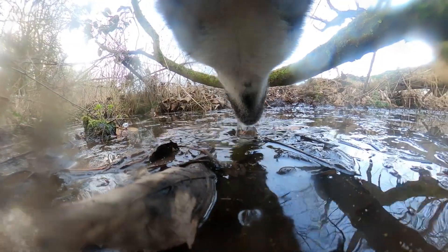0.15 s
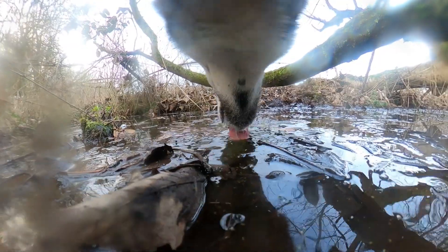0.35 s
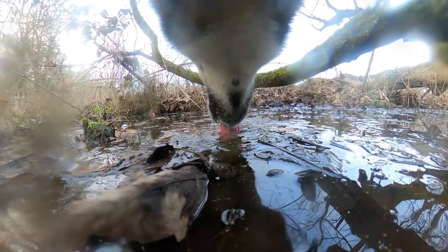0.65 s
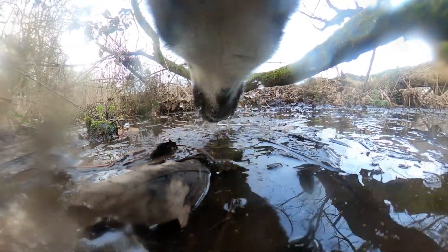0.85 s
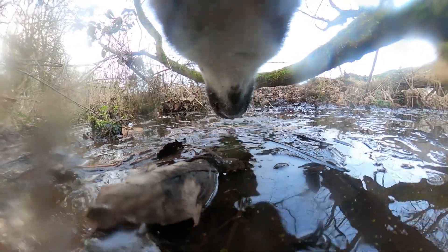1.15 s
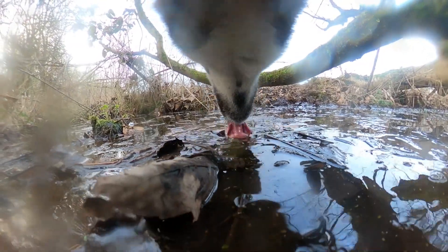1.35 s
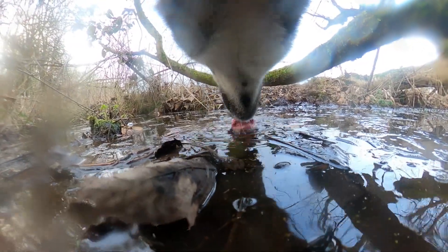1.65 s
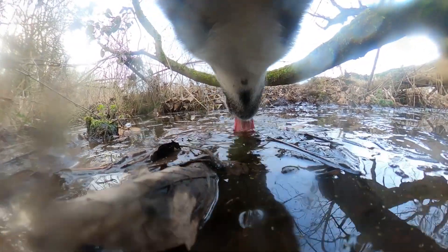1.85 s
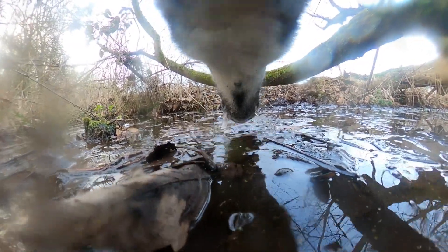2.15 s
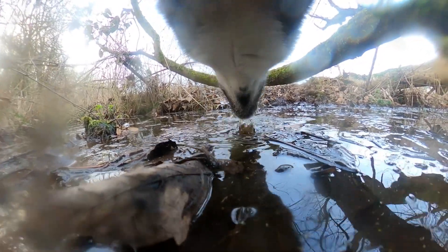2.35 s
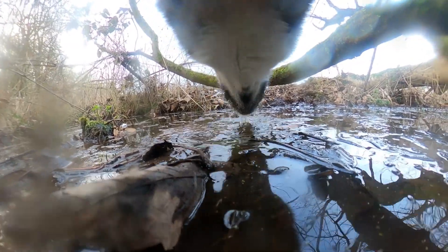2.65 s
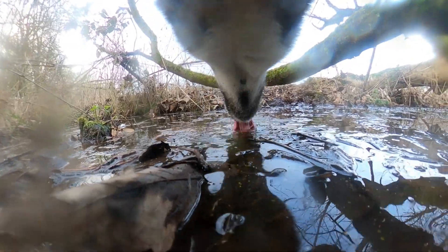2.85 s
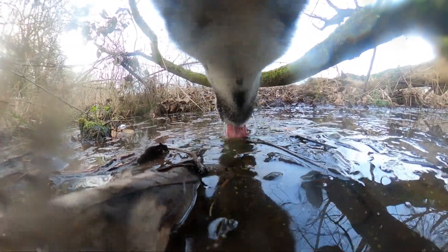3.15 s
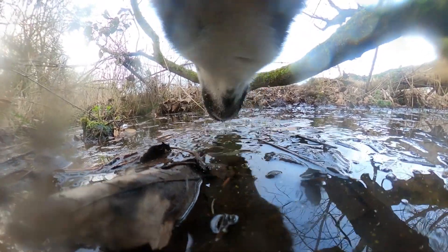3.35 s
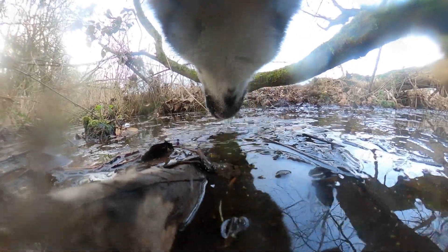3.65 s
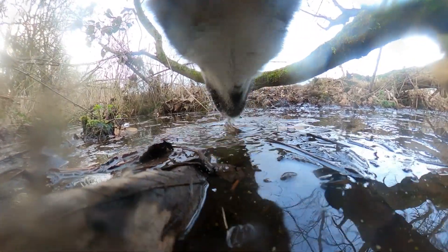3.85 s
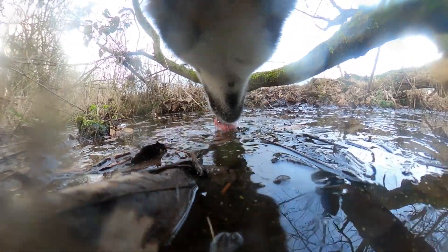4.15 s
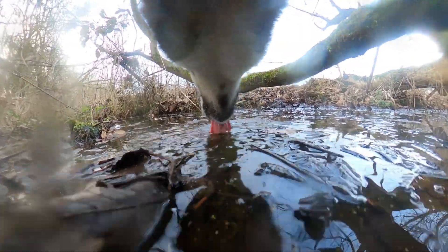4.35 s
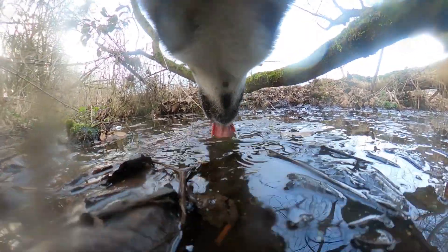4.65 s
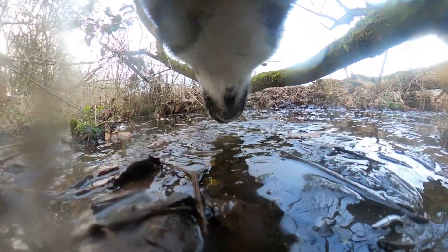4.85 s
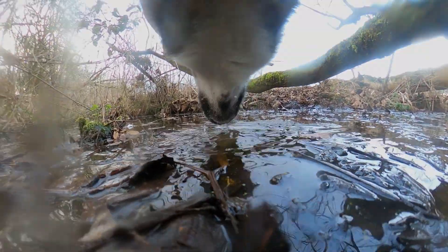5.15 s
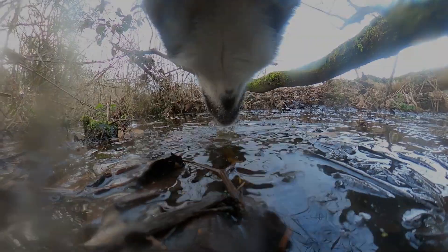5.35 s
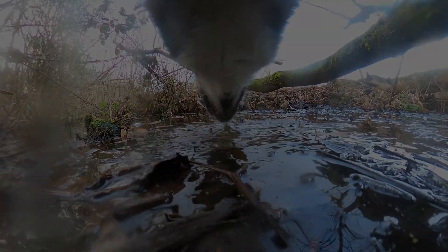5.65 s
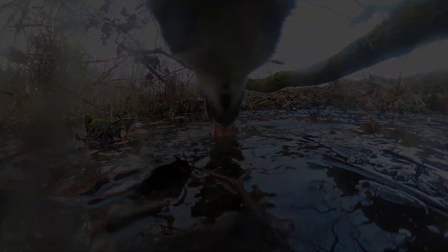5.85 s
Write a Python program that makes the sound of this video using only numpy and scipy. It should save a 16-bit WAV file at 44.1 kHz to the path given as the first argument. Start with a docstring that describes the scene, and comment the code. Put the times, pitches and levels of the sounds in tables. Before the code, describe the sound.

A dog laps from a shallow stream right beside a sealed microphone, outdoors and with almost no echo. After a little dribble and a few bubbles, the first lick comes at about 0.25 s; then roughly three a second follow until the end, the last near 5.7 s. Each begins with a soft slosh, closes in a deep, short, hollow gulp around 70 to 115 Hz, and ends some 30 ms later in a crisp wet smack. Between licks the tongue clicks free, water spills from the muzzle and bubbles plop or chirp. Gulps vary, heavier near 2.7, 3.6, 4.5 and 5.4 s; smacks are sharp near 1.8, 4.9 and 5.8 s. Ripples rumble and knock softly, strongest around 4.3 s. A faint stream washes behind. Tiny high bird whistles appear near 0.5, 1.0, 3.1, 3.4 and 5.3 s; a faint wavering low hum enters around 4.9 s.

```python
"""At a shallow stream, a dog laps water close by, about three licks a second.
In each lick the tongue dips with a slosh, the hollow it leaves closes with a low gulp, and the mouth shuts
with a wet smack. Air pockets ring as damped tones; moving water is clouds of tiny bubbles and shaped noise.
In between, the tongue clicks free, water spills back from the muzzle and bubbles plink.
Ripples rock a sealed housing, the stream washes faintly behind, a faint hum comes late, a far bird whistles."""
import sys
import numpy as np
from scipy import signal
from scipy.fft import rfft, irfft
from scipy.io import wavfile

SR = 44100
rng = np.random.default_rng(int(sys.argv[2]) if len(sys.argv) > 2 else 0)


def wav_record(signal):
    """Record a signal, one row per channel, as 16-bit PCM in the file named by sys.argv[1]."""
    frames = np.transpose(np.atleast_2d(signal))
    bounded = np.clip(frames, -1, 1)
    # unit amplitude maps onto the largest positive 16-bit level
    quanta = np.round(bounded * 32767).astype(np.int16)
    wavfile.write(sys.argv[1], SR, quanta)


N = 264600
TIME = np.arange(N) / SR

# Spectra, which set only the tone colour: (frequency [Hz], relative level per Hz [dB])
# far running water
STREAM_SPECTRUM = [(200, 1.5), (400, -2), (520, -12), (700, -4.5), (900, -3), (1100, 3.5), (1550, -2.5),
                   (2300, -13), (3500, -20.5), (4600, -27), (6400, -26.5), (7500, -22), (8500, -28.5),
                   (10500, -41), (14000, -56.5)]
# slow rocking by the ripples
ROCKING_SPECTRUM = [(12, 7.5), (26, 5), (45, 3), (70, -9), (110, -29.5)]
# soft knocks of lapping ripples, and the heave of stirred water
LAPPING_SPECTRUM = [(45, 5), (75, 3.5), (115, 2), (160, -4.5), (220, -14), (310, -20.5), (450, -30.5)]
# coarse bubbles in stirred water
SLOSH_SPECTRUM = [(300, 8), (480, -4.5), (680, -10.5), (870, 4), (1170, -4.5), (1420, -7.5), (1750, -2.5),
                  (2100, -26.5)]
# fine bubbles in stirred water
SPRAY_SPECTRUM = [(2000, 2), (2400, -2.5), (2850, 3.5), (3800, -0.5), (4400, -11.5), (5200, -13),
                  (6500, -21.5), (7400, -10), (8300, -27.5), (10000, -29.5), (12000, -46.5)]
# fizz of the tearing water column
TEAR_SPECTRUM = [(1500, -14.5), (3300, 4), (5000, -2), (7400, -4), (8600, -8.5), (11000, -23.5)]

# whistles of the far-off small bird: (start [s], length [s], top pitch [Hz], peak level [dB])
WHISTLES = [(0.462, 0.12, 8150, -81), (1.037, 0.093, 5680, -76), (3.053, 0.12, 8000, -86),
            (3.418, .06, 8100, -82), (5.29, 0.085, 8050, -75)]
# path of the faint hum: (time [s], pitch [Hz], level [dB])
HUM_PATH = [(4.85, 272, -68), (5.0, 281, -51.5), (5.3, 293.5, -51.5), (5.6, 292, -63), (6.0, 299, -56)]
# strength of the ripples: (time [s], relative rocking level [dB], relative lapping level [dB])
RIPPLE_LEVELS = [(0.0, -41.5, -44), (0.73, -39.5, -42), (0.98, -42.5, -48), (1.45, -43, -40),
                 (1.59, -35, -44), (2.04, -49, -41), (2.44, -38.5, -47), (2.62, -41.5, -38.5),
                 (3.29, -45, -43.5), (3.94, -48, -39), (4.28, -30.5, -40), (4.41, -33.5, -37.5),
                 (4.71, -46, -34), (4.88, -40, -50), (5.15, -54.5, -38), (5.43, -35, -40.5),
                 (5.56, -41.5, -33.5), (6.0, -40, -46)]
# water spills back from the muzzle and lands:
# (crest time [s], relative slosh level [dB], relative spray level [dB], thud level [dB])
SPILLS = [(0.082, -51, -65, -45), (0.471, -51, -62, -23.5), (0.704, -47, -55.5, -32.5),
          (3.774, -53.5, -59, -27.5), (4.39, -52, -52.5, -28), (5.559, -50, -55, -19.5)]
# single bubbles: (start [s], level [dB], pitch [Hz], ring time [cycles])
BUBBLES = [(0.0027, -35.5, 1138, 11), (0.096, -35, 430, 2.2), (0.0983, -38, 1160, 5.5),
           (0.166, -33.5, 427, 2.3), (0.4664, -40.5, 7200, 2.8), (0.4718, -35, 356, 1.9),
           (0.5304, -28.5, 637, 1.2), (0.543, -31.5, 418, 3.4), (0.5684, -32, 1030, 1.6),
           (0.6066, -37, 294, 1.6), (0.7055, -40.5, 422, 4.5), (0.8021, -32, 390, 1.1),
           (0.873, -33.5, 2990, 11), (0.8989, -33, 3450, 2.9), (0.8994, -31.5, 1130, 8.9),
           (0.965, -37, 425, 1.6), (1.1087, -42.5, 3750, 5.5), (1.3406, -25, 2850, 1.5),
           (1.4411, -32, 442, 1.4), (1.4865, -37.5, 490, 0.88), (1.5609, -36.5, 4800, 6.6),
           (1.598, -32.5, 352, 1.8), (1.7367, -35.5, 1125, 8.7), (1.7797, -34.5, 957, 20),
           (1.81, -34, 6800, 8.1), (1.827, -19, 2770, 0.56), (1.844, -30.5, 3320, 3.9),
           (2.0467, -36, 3200, 1.5), (2.0605, -40, 1350, 4.9), (2.1073, -35, 988, 11),
           (2.269, -32.5, 307, 0.99), (2.4541, -39, 5930, 4.3), (2.398, -30, 610, 0.51),
           (2.4523, -22.5, 303, 0.69), (2.4855, -31, 343, 1.3), (2.5294, -31, 325, 1.3),
           (2.6814, -29, 916, 9), (2.6946, -17.5, 755, 0.74), (2.696, -34, 6030, 8),
           (2.7145, -25.5, 880, 1.7), (2.7231, -34, 334, 5), (2.774, -30.5, 423, 1.5),
           (2.746, -33, 1130, 12), (2.8606, -39, 395, 2.4), (3.0061, -31.5, 990, 4.4),
           (3.037, -36, 1160, 13), (3.312, -29, 410, 0.45), (3.414, -32, 7470, 5.8), (3.6124, -34, 925, 10),
           (3.6194, -26.5, 1090, 10), (3.6475, -32, 344, 3.4), (3.671, -26.5, 3540, 3.6),
           (3.6782, -36, 7700, 9), (3.6937, -23, 3540, 6.2), (3.781, -32.5, 400, 3.2),
           (3.7831, -34, 1580, 6.3), (3.956, -37.5, 1088, 16.4), (4.109, -30.5, 1700, 1.1),
           (4.1745, -27.5, 1136, 8.3), (4.2105, -25, 868, 3.9), (4.213, -26.5, 367, 1.05),
           (4.2415, -29, 870, 1.9), (4.3064, -37, 6450, 3.6), (4.3792, -38, 2220, 6.7),
           (4.391, -33.5, 1420, 4.5), (4.434, -38.5, 2200, 4.4), (4.513, -33, 3430, 2),
           (4.537, -22, 958, 7.6), (4.5572, -28, 330, 2), (4.5925, -31, 3100, 3.9),
           (4.689, -31.5, 394, 1.1), (5.115, -35, 292, 2.1), (5.1487, -30, 940, 0.62),
           (5.2169, -28, 2900, 1), (5.4092, -31, 1062, 20.5), (5.4219, -28.5, 962, 5.7),
           (5.4701, -29.5, 1104, 6.3), (5.487, -29, 2200, 3.8), (5.5512, -29.5, 390.5, 6.4),
           (5.5678, -31, 416, 1.6), (5.7059, -33.5, 870, 2.9), (5.7617, -33, 8240, 1.6)]
# the wet tongue peels free between licks:
# (start [s], level [dB], pitch [Hz], ring time [cycles], relative spray level [dB])
CLICKS = [(0.0024, -31.5, 1730, 3.6, -41.5), (0.4321, -25, 1740, 1.8, -49), (0.7676, -35, 1720, 1, -51),
          (1.0166, -51, 2790, 7.5, -62), (1.3454, -24.5, 1770, 4.1, -44.5), (1.4497, -34, 1990, 1.2, -50.5),
          (1.965, -36.5, 1040, 7, -46.5), (2.2687, -33, 3420, 4.2, -67), (2.32, -39, 1480, 1, -51.5),
          (2.581, -57, 2700, 15, -50.5), (2.9574, -33.5, 2270, 9.1, -46.5), (3.206, -64, 2900, 3, -51),
          (3.497, -39, 2330, 7.3, -43), (3.8275, -33.5, 2880, 1.1, -50), (4.1, -32.5, 3620, 10, -48.5),
          (4.211, -24, 1470, 2.3, -53), (4.7245, -36.5, 3100, 4.9, -46.5), (5.0259, -25, 1254, 2.8, -53.5),
          (5.2545, -33.5, 1570, 2.8, -49), (5.664, -35, 3070, 5.3, -45.5)]
# the tongue enters the water: (start [s], time to the crest [s], relative slosh level [dB],
# relative spray level [dB], thud level [dB], thud pitch [Hz])
DIPS = [(0.233, 0.048, -46, -56.5, -45, 91), (0.566, 0.0064, -45, -55.5, -24, 59.4),
        (0.804, 0.067, -42.5, -47, -20, 107), (1.104, 0.041, -50, -57, -45, 76.6),
        (1.478, 0.0097, -46, -60.5, -24, 61.8), (1.726, 0.037, -41.5, -48.5, -23, 76.3),
        (2.036, 0.021, -46.5, -53, -26, 96.7), (2.386, 0.042, -44.5, -58, -20.5, 110),
        (2.655, 0.043, -40, -50, -16, 99.6), (2.964, 0.031, -48.5, -54.5, -27, 105),
        (3.336, 0.034, -46, -54, -20, 102.3), (3.607, 0.019, -36.5, -45, -22.5, 140),
        (3.904, 0.026, -45.5, -49.5, -49, 88), (4.241, 0.0089, -42.5, -48, -19, 101.4),
        (4.501, .038, -39, -47.5, -21, 66.5), (4.771, 0.044, -45, -49.5, -39, 91),
        (5.118, 0.044, -46.5, -54.5, -29.5, 91.5), (5.402, 0.031, -42, -49, -14.5, 86.8),
        (5.668, 0.038, -44, -55, -38, 90)]
# the tongue is pulled up and the hollow under it closes:
# (start [s], thud level [dB], thud pitch [Hz], ring time [cycles], plop level [dB])
GULPS = [(0.2777, -17, 108, 0.64, -20.5), (0.6101, -18, 100, 0.49, -44), (0.8837, -18, 116, 0.44, -37),
         (1.1752, -21.5, 98, 0.96, -38), (1.5229, -23.5, 90.5, .5, -32), (1.7925, -16, 88.4, 1.95, -41),
         (2.1051, -19.5, 86.5, 0.46, -22), (2.453, -15.5, 109.6, 0.63, -23), (2.721, -9, 97, 1.06, -42),
         (3.036, -28, 81.5, 1, -38), (3.3872, -17.5, 70, 0.4, -47), (3.6356, -12.5, 71.3, 1.4, -49),
         (3.9502, -16.5, 104, 0.22, -35), (4.3033, -19.5, 74.5, 0.92, -29), (4.545, -12, 68.5, 1.5, -36),
         (4.8553, -12.5, 105, 0.25, -29), (5.178, -21.5, 101, 0.99, -47), (5.4313, -11, 100.5, 2.45, -51),
         (5.7386, -18.5, 90, 0.31, -25)]
# the mouth shuts on the water: (crest time [s], relative slosh level [dB], relative spray level [dB],
# mouth ring level [dB], mouth pitch [Hz], lip snap level [dB], lip snap pitch [Hz])
SMACKS = [(0.307, -67, -45, -36.5, 1660, -36.5, 4400), (0.627, -44, -44.5, -30.5, 1065, -31.5, 2300),
          (0.91, -42.5, -44.5, -43, 1440, -25.5, 2800), (1.196, -46, -45, -36.5, 1080, -34.5, 2840),
          (1.544, -40, -44, -49, 1320, -28.5, 3800), (1.818, -42.5, -40.5, -32, 1116, -18, 3540),
          (2.121, -39, -42.5, -31, 1335, -39, 4500), (2.473, -42, -45, -32.5, 1570, -38, 2700),
          (2.757, -50, -42, -39, 1380, -22.5, 3360), (3.051, -42.5, -40.5, -29.5, 1080, -37, 4300),
          (3.406, -44, -43, -39, 1110, -27, 3200), (3.681, -40.5, -40, -28, 1190, -23.5, 2770),
          (3.973, -45, -45, -35.5, 1016, -34, 3110), (4.321, -43.5, -44, -31, 1380, -23.5, 3900),
          (4.587, -48.5, -44.5, -33, 1660, -27.5, 2900), (4.874, -37, -45, -23, 1194, -20, 3400),
          (5.209, -40, -41, -48, 1290, -32, 2850), (5.477, -48, -41.5, -28.5, 1610, -28.5, 3620),
          (5.76, -42, -42.5, -34, 1042, -20, 3230)]

# how fast each burst of water swells and dies away
DIP_FALL_S = 0.045
SMACK_RISE_S, SMACK_FALL_S = 0.0066, 0.015
CLICK_RISE_S, CLICK_FALL_S = 0.0067, 0.0077
SPILL_RISE_S, SPILL_FALL_S = 0.073, 0.061
# the water column tears just before the smack; its level is relative to the smack's spray
TEAR_AHEAD_S, TEAR_RISE_S, TEAR_FALL_S, TEAR_DB = 0.016, 0.0024, 0.0086, -6
# the shrinking mouth rings low first, then the lips snap
MOUTH_AHEAD_S, MOUTH_CYCLES, SNAP_CYCLES = 0.00426, 5.6, 2.2
PLOP_HZ, PLOP_CYCLES = 588, 0.52
CLICK_LIP_DB, CLICK_LIP_HZ = -12, 3310  # each click also rings at the lips, relative to the click
THUD_CYCLES, SPILL_THUD_HZ = 2.33, 89.2  # ring time of dip and spill thuds; pitch of spill thuds
# a pocket takes this long to start ringing, plus a share of its ring time
OPENING_CYCLES, OPENING_SHARE = 0.42, 0.12
SNAP_ATTACK_S = 0.001  # a wet film tears gradually


def from_db(db):
    """Turn decibels into gain."""
    return 10 ** (np.asarray(db) / 20)


def rms_one(x):
    """Scale to unit rms, the usual measure of average strength."""
    return x / np.sqrt(np.mean(x ** 2) + 1e-20)


def at_hz(points, hz):
    """Read a spectrum along a log-frequency axis."""
    points = np.array(points)
    return np.interp(np.log(hz), np.log(points[:, 0]), points[:, 1])


def add(track, s, sound):
    """Mix a sound into a track from time s on."""
    start = int(np.clip(round(s * SR), 0, N - 1))
    track[start:start + len(sound)] += sound[:N - start]


def drift(rate):
    """Random wander along straight lines, with `rate` new target points a second; spread 1."""
    knots = rng.standard_normal(1024)
    return rms_one(np.interp(TIME * rate, np.arange(len(knots)), knots))


def coloured_noise(spectrum):
    """Steady noise with the given spectrum, falling steeply beyond its ends; rms 1."""
    hz = np.maximum(np.fft.rfftfreq(N, 1 / SR), 1)
    ends = np.minimum(1, np.minimum(hz / spectrum[0][0], spectrum[-1][0] / hz)) ** 4
    white = rfft(rng.standard_normal(N))
    return rms_one(irfft(white * from_db(at_hz(spectrum, hz)) * ends, N))


def cavity(hz, ring_cycles, onset_cycles, rise):
    """A pocket of air rings as a fading sine whose pitch glides as it changes shape (up if rise > 0)."""
    ring_cycles = max(ring_cycles, .3)
    length = int(8 * (ring_cycles + onset_cycles) * SR / hz)
    cycles = np.arange(length) * hz / SR
    swing = (1 - np.exp(-(cycles / onset_cycles) ** 2)) * np.exp(-cycles / ring_cycles)
    # the pitch starts on one side of hz and ends on the other
    pitch = hz * (1 + rise * np.tanh((cycles - onset_cycles) / ring_cycles / 2 - 1 / 4))
    return swing / swing.max() * np.sin(2 * np.pi * np.cumsum(pitch) / SR)


def bubble_cloud(spectrum, per_s, spread_db, ring_cycles, count):
    """Many small bubbles of uneven loudness, born at random, in `count` pitches; rms 1."""
    out = np.zeros(N)
    for hz in np.geomspace(spectrum[0][0], spectrum[-1][0], count):
        births = np.flatnonzero(rng.random(N) < per_s / count / SR)
        chance = rng.random(N)[births]
        # a few births are much louder than the rest, up to a limit
        loudness_db = spread_db * np.minimum(-np.log(chance), 3)
        impulses = np.zeros(N)
        impulses[births] = from_db(loudness_db) * (-1) ** births
        ring = cavity(hz, ring_cycles, onset_cycles=0.25, rise=0.14)
        rings = signal.oaconvolve(impulses, ring)[:N]
        # each pitch covers a band whose width grows with its frequency
        out += rms_one(rings) * from_db(at_hz(spectrum, hz)) * np.sqrt(hz)
    return rms_one(out)


def swell(s, rise_s, fall_s):
    """Power of a burst that swells to its crest at s and dies away."""
    distance = np.maximum((s - TIME) / rise_s, (TIME - s) / fall_s)
    return np.exp(-2 * np.minimum(distance, 20))


def stream():
    """Running water too far off for single bubbles to stand out: soft noise whose level flickers a little."""
    return from_db(-55.0 + 1.9 * drift(20)) * coloured_noise(STREAM_SPECTRUM)


def bird():
    """Each whistle is a sine that swells, arches slightly in pitch and fades."""
    out = np.zeros(N)
    for s, length_s, hz, db in WHISTLES:
        arch = np.sin(np.linspace(0, np.pi, int(length_s * SR)))
        pitch = hz * (1 + .01 * (arch - 1))
        add(out, s, from_db(db) * arch * np.sin(2 * np.pi * np.cumsum(pitch) / SR))
    return out


def hum():
    """One faint sine behind the water, wavering in pitch and level."""
    s, hz, db = np.transpose(HUM_PATH)
    pitch = np.interp(TIME, s, hz) + 1.54 * drift(8)
    level = from_db(np.interp(TIME, s, db) + 1.5 * drift(4.25)) * (TIME > s[0])
    return level * np.sqrt(2) * np.sin(2 * np.pi * np.cumsum(pitch) / SR)


def ripples():
    """Small waves rock the housing and lap at it in soft knocks, over a faint gurgle of dull bubbles."""
    s, rocking_db, lapping_db = np.transpose(RIPPLE_LEVELS)
    rocking = from_db(np.interp(TIME, s, rocking_db) + 7.5) * coloured_noise(ROCKING_SPECTRUM)
    knocks = bubble_cloud(LAPPING_SPECTRUM, per_s=190, spread_db=3.0, ring_cycles=0.71, count=10)
    lapping = from_db(np.interp(TIME, s, lapping_db) + 3) * knocks
    dull_bubbles = bubble_cloud([(230, 4), (560, -13)], per_s=37, spread_db=4.0, ring_cycles=0.91, count=8)
    return rocking + lapping + from_db(-57.5) * dull_bubbles


def churn(power, grains, wash, breakup_db):
    """Gently stirred water only washes; stirred harder than breakup_db, it is mostly separate bubbles."""
    broken = power / (power + from_db(breakup_db) ** 2)
    return np.sqrt(power * broken) * grains + np.sqrt(power * (1 - broken)) * wash


def splashes(click_slosh_db):
    """Licks and spills churn the water: coarse bubbles slosh, fine ones spray, the water heaves below."""
    bursts = []  # (crest [s], slosh [dB], spray [dB], rise [s], fall [s])
    for s, rise_s, slosh_db, spray_db, *_ in DIPS:
        bursts.append((s + rise_s, slosh_db, spray_db, rise_s, DIP_FALL_S))
    for s, slosh_db, spray_db, *_ in SMACKS:
        bursts.append((s, slosh_db, spray_db, SMACK_RISE_S, SMACK_FALL_S))
    for s, *_, spray_db in CLICKS:
        crest_s = s + CLICK_RISE_S / 2
        bursts.append((crest_s, spray_db + click_slosh_db, spray_db, CLICK_RISE_S, CLICK_FALL_S))
    for s, slosh_db, spray_db, _ in SPILLS:
        bursts.append((s, slosh_db, spray_db, SPILL_RISE_S, SPILL_FALL_S))

    slosh_power, spray_power = np.zeros((2, N))
    for s, slosh_db, spray_db, rise_s, fall_s in bursts:
        shape = swell(s, rise_s, fall_s)
        slosh_power += from_db(slosh_db) ** 2 * shape
        spray_power += from_db(spray_db) ** 2 * shape

    coarse = from_db(4.7) * bubble_cloud(SLOSH_SPECTRUM, per_s=1200, spread_db=4, ring_cycles=3.7, count=20)
    fine = from_db(1.4) * bubble_cloud(SPRAY_SPECTRUM, per_s=2000, spread_db=5.5, ring_cycles=7.8, count=32)
    slosh_wash = from_db(-8.0) * coloured_noise(SLOSH_SPECTRUM)
    spray_wash = from_db(-5.5) * coloured_noise(SPRAY_SPECTRUM)
    slosh = churn(slosh_power, coarse, slosh_wash, breakup_db=-49.5)
    spray = churn(spray_power, fine, spray_wash, breakup_db=-59.5)
    heave = from_db(11.5) * np.sqrt(slosh_power) * coloured_noise(LAPPING_SPECTRUM)
    return slosh + spray + heave


def droplets(first_s, last_s, level_db, spread_db, low_hz, high_hz, ring_cycles, count):
    """Every lick sheds `count` small bubbles at random, between first_s and last_s after its smack."""
    smack_s = np.repeat([smack[0] for smack in SMACKS], count)
    when, size, pitch, ring = rng.random((len(smack_s), 4)).T
    start_s = smack_s + first_s + when * (last_s - first_s)
    db = level_db + spread_db * (2 * size - 1)
    hz = low_hz * (high_hz / low_hz) ** pitch
    return list(zip(start_s, db, hz, ring_cycles * (.5 + ring)))


def ring_pockets(pockets, rise, fall, snap_db, snap_s):
    """For each (s, dB, Hz, cycles) a film of water tears with a tiny snap and a cavity rings."""
    rings, tearing = np.zeros((2, N))
    t = TIME[:SR // 20]
    snap = (1 - np.exp(-t / SNAP_ATTACK_S)) * np.exp(-t / snap_s)
    for s, db, hz, ring_cycles in pockets:
        # wide hollows are still opening and plop downward; small closed bubbles chirp upward
        hollow = np.interp(hz, [700, 950], [1, 0])
        glide = (1 - hollow) * rise - hollow * min(fall, .9)
        onset_cycles = OPENING_CYCLES + OPENING_SHARE * ring_cycles
        add(rings, s, from_db(db) * cavity(hz, ring_cycles, onset_cycles, glide))
        # small pockets snap more strongly than large ones
        crispness = min(hz / 3000, 1) ** .5
        add(tearing, s, from_db(db + snap_db) * crispness * snap)
    return rings + tearing * coloured_noise(SPRAY_SPECTRUM)


def scatter(x, decay_s, level_db):
    """Muzzle, water and bank throw back a faint, very short spray of echoes."""
    t = TIME[:SR // 8]
    echoes = rng.standard_normal(len(t)) * np.exp(-t / decay_s) * (t > .001)
    echoes /= np.linalg.norm(echoes)
    return x + from_db(level_db) * signal.oaconvolve(x, echoes)[:N]


def thuds(rise, overtone, overtone_db):
    """Tongue and spills shove water aside and hollows close: deep thuds, each with a smaller ring above."""
    shoves = [(s, db, hz, THUD_CYCLES) for s, *_, db, hz in DIPS]
    shoves += [(s, db, SPILL_THUD_HZ, THUD_CYCLES) for s, *_, db in SPILLS]
    closings = [gulp[:4] for gulp in GULPS]
    out = np.zeros(N)
    for s, db, hz, ring_cycles in shoves + closings:
        deep = cavity(hz, ring_cycles, onset_cycles=0.92, rise=rise)
        small = cavity(hz * overtone, ring_cycles=0.53, onset_cycles=0.79, rise=rise)
        add(out, s, from_db(db) * deep)
        # the smaller pocket starts half a thud cycle later
        add(out, s + .5 / hz, from_db(db + overtone_db) * small)
    return out


def tears():
    """The column of water on the tongue snaps off in a brief bright fizz of noise."""
    power = np.zeros(N)
    for s, _, spray_db, *_ in SMACKS:
        power += from_db(spray_db + TEAR_DB) ** 2 * swell(s - TEAR_AHEAD_S, TEAR_RISE_S, TEAR_FALL_S)
    return np.sqrt(power) * coloured_noise(TEAR_SPECTRUM)


def mouth_pockets():
    """List the air pockets of a lick: hollow plop, shutting mouth, lips, and the tongue peeling free."""
    pockets = [(s, plop_db, PLOP_HZ, PLOP_CYCLES) for s, *_, plop_db in GULPS]
    for s, _, _, mouth_db, mouth_hz, snap_db, snap_hz in SMACKS:
        pockets.append((s - MOUTH_AHEAD_S, mouth_db, mouth_hz, MOUTH_CYCLES))
        pockets.append((s, snap_db, snap_hz, SNAP_CYCLES))
    for s, db, hz, ring_cycles, _ in CLICKS:
        pockets.append((s, db, hz, ring_cycles))
        pockets.append((s, db + CLICK_LIP_DB, CLICK_LIP_HZ, SNAP_CYCLES))
    return pockets


def scene():
    """The drinking dog close by, over the moving water, the hum and the far bird."""
    background = stream() + bird() + hum() + ripples()
    water = splashes(click_slosh_db=-5) + tears()
    shed = droplets(first_s=.04, last_s=0.19, level_db=-46.5, spread_db=1.5,
                    low_hz=335, high_hz=480, ring_cycles=1.3, count=2)
    bubbles = ring_pockets(BUBBLES + shed, rise=0.079, fall=0.25, snap_db=-15.5, snap_s=0.0037)
    mouth = ring_pockets(mouth_pockets(), rise=0.092, fall=0.9, snap_db=-17.5, snap_s=.004)
    wet = scatter(mouth + bubbles, decay_s=0.012, level_db=-8)
    low = thuds(rise=0.018, overtone=2.0, overtone_db=-15)
    return (background + water + wet + low)[None]


def record(dry):
    """The sealed housing rings faintly at its port and dulls the highest treble; the top is cut."""
    port_hz, port_q, port_db = 7300, 16, -7
    port = signal.lfilter(*signal.iirpeak(port_hz, port_q, fs=SR), dry)
    dulling = signal.butter(3, 10000, fs=SR, output="sos")
    housed = signal.sosfilt(dulling, dry + from_db(port_db) * port)
    # from 14500 Hz up, everything is at least 70 dB down
    top_cut = signal.cheby2(12, 70, 14500, fs=SR, output="sos")
    return signal.sosfilt(top_cut, housed)


dry = scene()
out = record(dry)
wav_record(out)
```